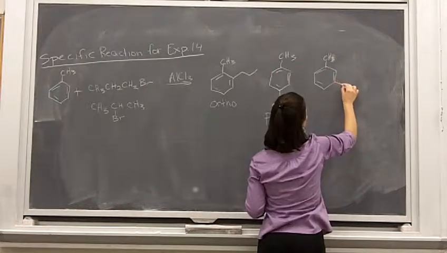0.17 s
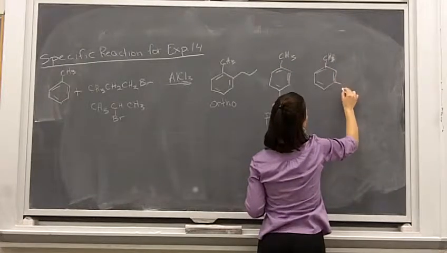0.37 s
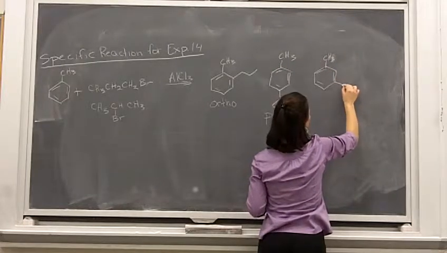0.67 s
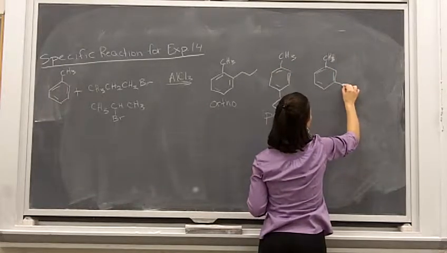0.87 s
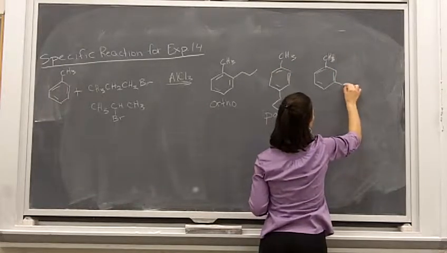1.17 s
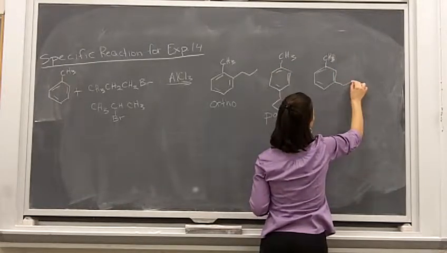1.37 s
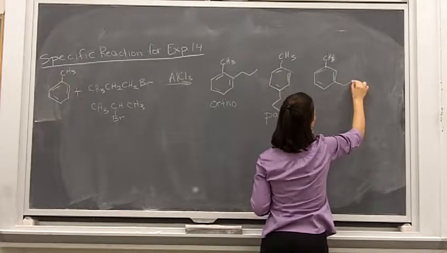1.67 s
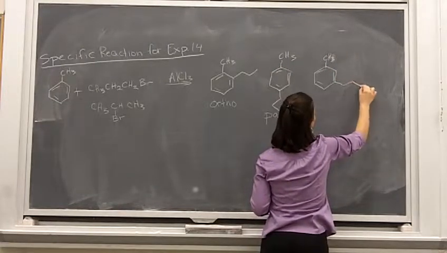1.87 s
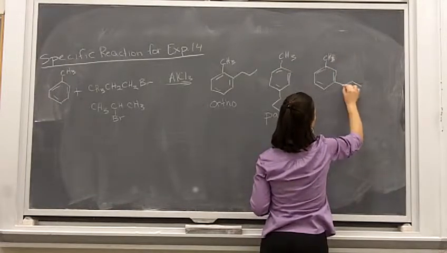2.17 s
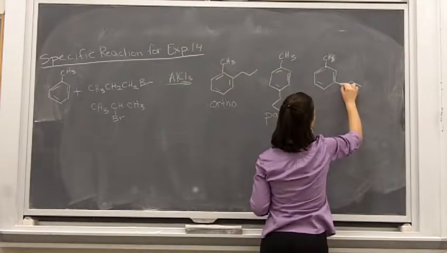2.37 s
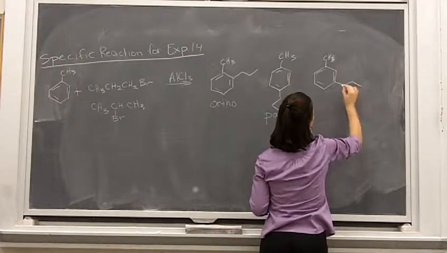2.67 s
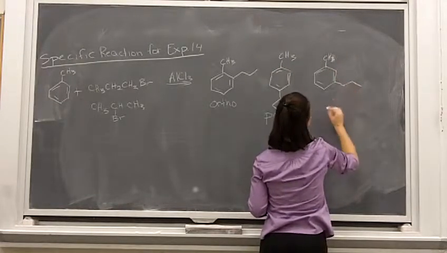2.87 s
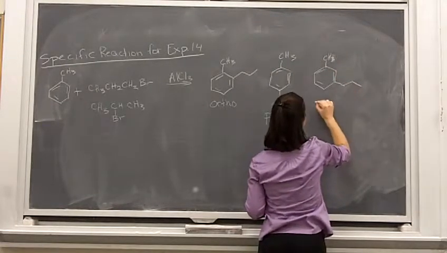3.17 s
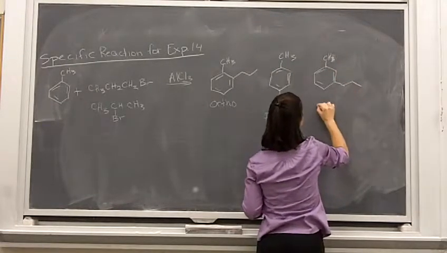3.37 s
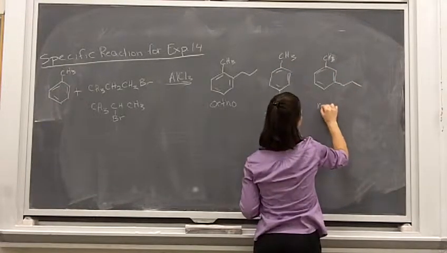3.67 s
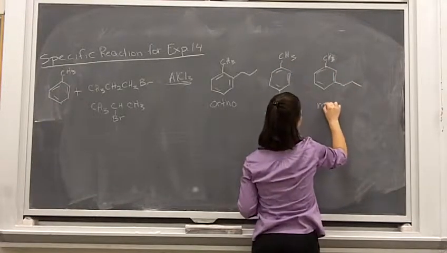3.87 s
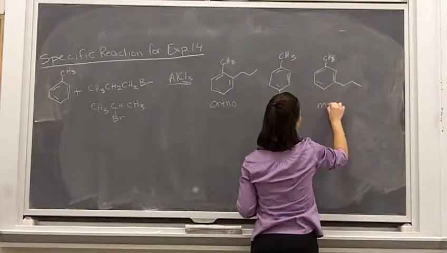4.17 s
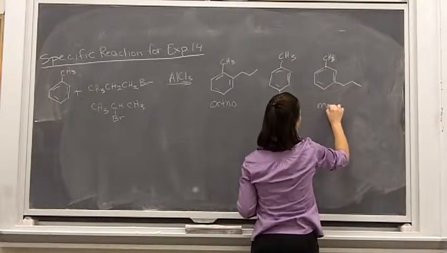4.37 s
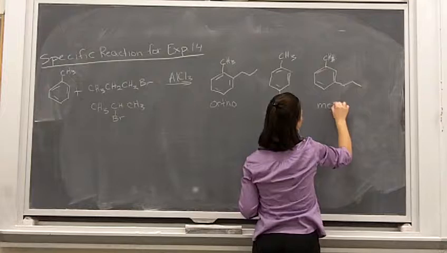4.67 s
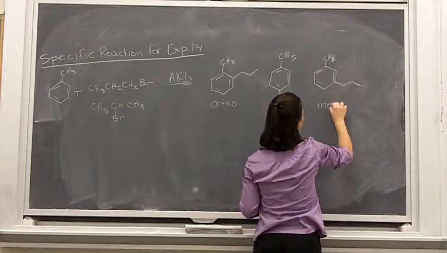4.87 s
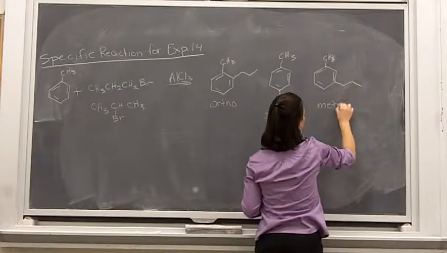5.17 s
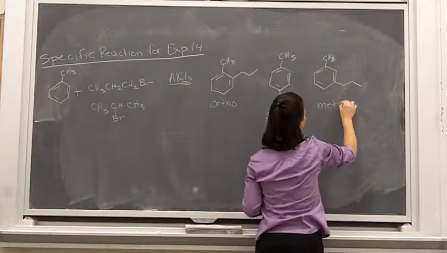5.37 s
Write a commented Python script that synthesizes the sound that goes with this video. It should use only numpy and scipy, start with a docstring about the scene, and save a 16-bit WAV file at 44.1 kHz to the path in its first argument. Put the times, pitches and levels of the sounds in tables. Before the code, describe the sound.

A classroom, heard from a camera a few metres from the blackboard. Low airy ventilation, slightly swelling rumble, faint mains hum, hiss, thin high whines and a rapid quiet ticking whirr last throughout. Chalk knocks the board immediately at 0 s, a hard tick with a woody, briefly ringing body and short room reflections. Lighter, brighter taps come near 0.95 and 1.1 s, a stronger one at 1.8 and another at 2.5. Firmer knocks fall at 3.45, 4.25, 4.75, 5.05 and 5.2 s. Between them are faint, dry, gritty rubs of about 0.1 to 0.3 s, clearest around 1.2, 3.6 and after 4.8 s. Close to the microphone, irregular dry crackly clicks tick all along, with small hollow pops from about 0.5 s; the strongest click and pop coincide at 3.3 s. Soft low bumps barely show near 1.6, 3.6 and 4.3 s. It ends amid chalk work.

```python
"""Ventilation, mains hum, thin whines, hiss and the ticking whirr of a camera's drive sound throughout.
Chalk, a few metres away, knocks at once on a blackboard: a tick, decaying modes and reflections.
Dry clicks close to the microphone follow as swarms of impulses; fainter ones fall at random throughout.
Then chalk rubs along the board as filtered grains, and small cavities pop as short decaying sines.
Later a few soft low bumps swell as sines of wandering pitch."""
import sys
import numpy as np
from scipy import signal
from scipy.fft import rfft, irfft
from scipy.io import wavfile
from scipy.ndimage import uniform_filter1d

SR = 44100
rng = np.random.default_rng(int(sys.argv[2]) if len(sys.argv) > 2 else 0)


def wrap_up_sound(samples):
    """Save the sound to the file named by the first command line argument, as 16-bit audio."""
    columns = np.atleast_2d(samples).T
    # keep every value between -1 and 1, then stretch to whole-number steps
    tamed = np.clip(columns, -1, 1)
    steps = np.round(tamed * 32767).astype(np.int16)
    wavfile.write(sys.argv[1], SR, steps)


N = 243167
TIME = np.arange(N) / SR  # s

# Levels in the tables are relative.
# Spectrum of the ventilation: [f/Hz, level/dB]
AIR_SPECTRUM = [(12, -39), (20, -3), (35, -13), (49, -17), (92, -20), (122, -24), (191, -29), (346, -35),
                (667, -45.5), (720, -34.5), (809, -38), (1240, -48.5), (2000, -50), (2600, -74),
                (4400, -120)]
# Spectrum of the duct rumble: [f/Hz, level/dB]
DUCT_SPECTRUM = [(10, -7.5), (22, -39), (30, -3.5), (40, -26), (70, -19.5), (300, -90)]
# Swelling of the duct rumble: [t/s, level/dB]
RUMBLE_LEVEL = [(0.0, -52.5), (1.56, -60), (2.36, -46), (3.28, -60), (4.35, -49.5), (4.96, -57), (5.5, -53)]
# Mains hum and thin high whines: [f/Hz, level/dB]
HUM_TONES = [(60, -52), (180, -65), (7866, -86.5), (10925, -106)]
# Spectrum of the hiss common to both channels: [f/Hz, level/dB]
HISS_SPECTRUM = [(1000, 8), (2100, 2.5), (3500, 0), (5000, -4), (7000, -1.5), (8500, -8), (12500, -8),
                 (13100, -17), (15000, -34)]
# Spectrum of the self-noise, unrelated left and right: [f/Hz, level/dB]
SELF_NOISE_SPECTRUM = [(20, 1), (150, -7.5), (400, -14), (720, -16), (950, -31.5), (3000, -38.5),
                       (5000, -52), (7000, -48), (8400, -35), (12400, -32.5), (13100, -49), (15000, -60)]
# Tones in each turn of the drive: [f/Hz, place in the turn/0-1, 1/e half-length/s, level/dB]
WHIRR_TONES = [(2676, .64, 0.0067, -69.5), (3140, 0.5, 0.00075, -63), (3350, 0.7, 0.0011, -60.5)]
# Chalk landings: [t/s, force level/dB, low-mode level/dB, treble level/dB, favoured f/Hz, favour level/dB]
CHALK_TAPS = [(.006, -1.5, -16.5, -24, 736, -0.5), (0.9439, -6.5, -13, 1.5, 815, 6),
              (1.121, -10, -17.5, 1, 790, 6.5), (1.7873, -.5, -16, 3.5, 740, 11),
              (2.506, -5, -16.5, 3.5, 780, 7), (3.4494, 3.5, -16.5, -3.5, 726, 2),
              (4.261, 4.5, -14.5, -3, 696, 6), (4.76, 5, -15, -5.5, 660, 9),
              (5.038, 3, -12.5, -3.5, 664, 4), (5.2238, -2, -11.5, -1.5, 800, 7)]
# Modes of the board: [f/Hz, level/dB, t60/s]
BOARD_MODES = [(137.9, 8.5, 0.41), (197, -22, 0.29), (273, -4, 0.58), (364, -9.5, 0.65),
               (420.4, -8.5, 0.45), (533, -17.5, 0.54), (592, -16, 0.54), (663, -6.5, 0.26),
               (759, -5, 0.31), (818, -3.5, 0.11), (910, -1, 0.046), (1200, -40, 0.54), (1225, -27, 0.71),
               (1466, -7, 0.085)]
# Spectrum of the first contact: [f/Hz, level/dB]
TICK_SPECTRUM = [(100, 11), (800, 5.5), (2000, 1.5), (4000, -4.5), (7000, -10.5), (11000, -26),
                 (15000, -74)]
# Spectrum of the panel's dense ring: [f/Hz, level/dB]
KNOCK_SPECTRUM = [(60, -19.5), (130, 0), (230, -5.5), (400, -3), (530, -3.5), (790, 4.5), (1000, -4.5),
                  (1200, -6.5), (1700, -9.5), (2600, -14), (4000, -23), (7000, -25), (10000, -42.5),
                  (15000, -45)]
# Clusters of early echoes off the walls: [delay t/s, level/dB, t60/s]
WALL_ECHOES = [(.007, -1, 0.079), (0.0219, -6, 0.11)]
# Decay of the room: [f/Hz, t60/s]
ROOM_DECAY = [(100, 1), (260, 0.61), (700, 0.54), (1840, 0.41), (4850, 0.25), (12000, 0.039)]
# Close clicks: [t/s, level/dB, spread of the snaps/s]
CLOSE_CLICKS = [(0.0538, -38, 0.0022), (.1625, -49.5, .0025), (.1976, -40, 0.0028), (0.3202, -37.5, 0.0069),
                (0.4548, -43, 0.0037), (0.5336, -47, 0.0014), (0.557, -46.5, 0.0029),
                (0.596, -51.5, 0.0048), (0.6862, -51, 0.0044), (.727, -54, 0.003), (0.7517, -50.5, 0.0047),
                (0.8212, -38.5, 0.0046), (0.9819, -48, .0034), (1.2244, -49, 0.003), (1.397, -45, 0.0033),
                (1.4067, -42.5, 0.0032), (1.5529, -45.5, 0.0045), (1.6683, -48.5, 0.011),
                (1.6932, -53, 0.0043), (1.8721, -45.5, 0.0034), (1.94, -48, 0.0027),
                (2.0243, -49.5, 0.0036), (2.0926, -49.5, 0.0017), (2.1371, -38, 0.0023),
                (2.166, -37.5, 0.0027), (2.257, -48.5, 0.0071), (2.301, -48.5, 0.0021),
                (2.3421, -53.5, 0.0051), (2.449, -53, 0.0027), (2.5012, -35, 0.0014), (2.588, -53.5, .004),
                (2.629, -44.5, 0.0025), (2.827, -47, 0.0039), (2.918, -45, 0.0024), (2.9683, -35, 0.0045),
                (3.0347, -55, .0043), (3.2882, -36, 0.0045), (3.2932, -27.5, 0.0025),
                (3.472, -44.5, 0.0052), (3.5901, -44, 0.0045), (3.6814, -43.5, 0.0052),
                (3.7875, -40.5, 0.0024), (3.8468, -41, 0.0025), (3.9667, -43.5, 0.0021),
                (4.0007, -47.5, 0.004), (4.0581, -48.5, 0.0051), (4.1016, -44, 0.0055),
                (4.153, -34.5, 0.0016), (4.205, -48, 0.0096), (4.3293, -44, 0.0035), (4.3718, -48, .0023),
                (4.4315, -40, .0044), (4.5988, -41.5, 0.0046), (4.6121, -38, 0.001), (4.693, -50.5, .004),
                (4.8198, -43.5, 0.0031), (4.9997, -50.5, 0.0035), (5.106, -43.5, 0.0024),
                (5.231, -36, 0.0041)]
# Spectrum of a click's bright snap: [f/Hz, level/dB]
SNAP_SPECTRUM = [(1500, -6.5), (4000, 3.5), (5500, 1), (7000, 5), (8200, 3), (10000, -3), (12500, -12),
                 (15000, -20)]
# Spectrum of a click's lower body: [f/Hz, level/dB]
SNAP_BODY_SPECTRUM = [(150, -2), (400, 8.5), (1000, 9), (1700, 3.5), (2800, -1), (4300, 7.5), (5500, -20),
                      (8000, -37.5)]
# Chalk drawn along the board: [t/s, length/s, level/dB]
CHALK_STROKES = [(0.435, 0.12, -61.5), (0.68, 0.098, -64), (1.166, 0.082, -58), (1.317, .062, -61.5),
                 (1.568, 0.23, -66), (1.847, 0.19, -65), (2.14, .16, -68), (2.55, 0.33, -66),
                 (3.543, 0.25, -59.5), (4.33, 0.34, -68), (4.815, 0.1, -62), (5.08, .13, -60),
                 (5.243, 0.18, -61.5)]
# Spectrum of the rubbing: [f/Hz, level/dB]
RUB_SPECTRUM = [(200, -6.5), (750, 1.5), (1300, -6.5), (2500, -5.5), (4300, -14.5), (7000, -13.5),
                (10000, -30), (15000, -30)]
# Close hollow pops: [t/s, level/dB, f/Hz]
HOLLOW_POPS = [(.462, -45.5, 720), (.531, -49, 776), (.754, -47, 870), (1.405, -40, 804), (1.513, -50, 990),
               (1.554, -39, 673), (1.668, -42.5, 747), (2.045, -49.5, 736), (2.091, -47, 810),
               (2.137, -47, 714), (2.264, -45, 725), (2.301, -48, 780), (2.37, -42, 774), (2.486, -45, 770),
               (2.724, -51.5, 526), (2.919, -43, 815), (3.293, -27, 614), (3.596, -36.5, 710),
               (3.68, -42, 717), (3.854, -40.5, 645), (3.998, -44.5, 780), (4.105, -42, 814),
               (4.214, -41.5, 690), (4.434, -52, 487), (4.608, -39.5, 682), (4.716, -46, 780),
               (5.002, -47.5, 920)]
# Modes of the popping cavity: [multiple of the pitch, level/dB, t60/s]
CAVITY_MODES = [(1.002, 0.5, 0.025), (1.62, -14, 0.027), (2.15, -9, 0.01), (2.8, -14, 0.018)]
# Soft low bumps: [t/s, length/s, mean f/Hz, level/dB]
LOW_BUMPS = [(1.571, 0.14, 240, -57), (1.618, 0.12, 180, -54), (3.632, 0.16, 107, -46.5),
             (4.313, 0.18, 30.8, -36.5)]
# Constant offset of each channel: one row per channel, [share of full scale]
CHANNEL_OFFSET = [
    [.0435],
    [.0087],
]

TURN_HZ = 29.96  # turns of the drive per second
EDGE_HZ = 15100  # upper limit of the band
CLICK_HZ, CLICK_SCATTER = 6860, .16  # centre of the treble peak, and its largest shift as a share
# A click at SOFT_CLICK_DB has SOFT_BODY_DB of body, which falls by SHARPEN dB per dB of level.
SOFT_CLICK_DB, SOFT_BODY_DB, SHARPEN = -48.5, 16, 0.52


def amp(db):
    """Level law: an amplitude ratio is ten to the power dB/20."""
    return 10 ** (np.asarray(db) / 20)


def evened(x):
    """Normalisation of power: scales to rms 1."""
    return x / np.sqrt(np.mean(x ** 2) + 1e-20)


def read(points, hz):
    """Interpolation on a logarithmic frequency axis."""
    f, value = np.transpose(points)
    return np.interp(np.log(hz + 1), np.log(f + 1), value)


def add(mix, s, sound):
    """Superposition: adds a sound into the mix from time s."""
    part = mix[max(round(s * SR), 0):][:len(sound)]
    part += sound[:len(part)]


def pulse(points, size=2048):
    """Minimum phase: the log gain fixes the phase of the sharpest causal pulse; energy 1."""
    log_gain = np.log(amp(read(points, abs(np.fft.fftfreq(size, 1 / SR)))))
    spectrum = np.exp(np.conj(signal.hilbert(log_gain)))
    h = np.fft.ifft(spectrum).real[:size // 2]
    return h / np.linalg.norm(h)


def band(x, lo_hz, hi_hz):
    """Band-pass filtering with gentle slopes."""
    sections = signal.butter(2, [lo_hz, min(hi_hz, .49 * SR)], "band", fs=SR, output="sos")
    return signal.sosfilt(sections, x)


def noise(points):
    """Spectral shaping of steady white noise; rms 1."""
    gain = amp(read(points, np.fft.rfftfreq(N, 1 / SR)))
    return evened(irfft(rfft(rng.standard_normal(N)) * gain, N))


def tail(t60s, size=32768):
    """Reverberation: dense reflections of random sign decay at their own rate in each band; energy 1."""
    hz, t, z = signal.stft(rng.choice([-1., 1.], size), SR, nperseg=256)
    decay = amp(-60 * t / read(t60s, hz)[:, None])
    h = signal.istft(z * decay, SR, nperseg=256)[1][:size]
    return h / np.linalg.norm(h)


def flatten(x, size):
    """Spectral whitening: evens out chance peaks and dips over size bins; energy 1."""
    z = rfft(x)
    local_power = uniform_filter1d(abs(z) ** 2, size)
    flat = irfft(z / np.sqrt(abs(local_power) + 1e-9), len(x))
    return flat / np.linalg.norm(flat)


def flat_tail(t60s):
    """Reverberation with a whitened spectrum, so that the tail adds little colour."""
    return flatten(tail(t60s), size=60)


def background(air_db=-63.5, hiss_db=-67, self_db=-64):
    """Superposition of independent sources: shaped noises, a swelling duct rumble and steady sines."""
    air = noise(AIR_SPECTRUM)
    air = air - band(air, 50.7, 71.3)  # leaves this band to the hum
    air *= amp(air_db) / np.std(band(air, 197, 2200))  # air_db is the level within this band
    duct = noise(DUCT_SPECTRUM) * amp(np.interp(TIME, *np.transpose(RUMBLE_LEVEL)))
    hum = np.zeros(N)
    for hz, db in HUM_TONES:
        hum += amp(db) * np.sqrt(2) * np.sin(2 * np.pi * (hz * TIME + rng.random()))
    own = amp(self_db) * np.array([noise(SELF_NOISE_SPECTRUM), noise(SELF_NOISE_SPECTRUM)])
    return air + duct + hum + amp(hiss_db) * noise(HISS_SPECTRUM) + own


def whirr(unsteady_rad=0.55, uneven_db=1.9):
    """Periodic modulation: each turn of the drive gates three brief tones of unsteady phase and level."""
    out = np.zeros(N)
    for hz, place, length, db in WHIRR_TONES:
        t = ((TIME * TURN_HZ - place + .5) % 1 - .5) / TURN_HZ  # time from the tone's centre
        waver = evened(uniform_filter1d(rng.standard_normal(N), 400))
        swell = evened(uniform_filter1d(rng.standard_normal(N), 1200))
        envelope = amp(db + uneven_db * swell) * np.exp(-(t / length) ** 2)
        out += envelope * np.sin(2 * np.pi * hz * t + unsteady_rad * waver)
    return out


def taps(level_db=-13, direct_db=-7, rattle_t60=0.31, room_db=-5, modes_db=-38, favour_width=0.077,
         alike=0.67):
    """Impact excitation: contact gives a tick, then the panel's dense ring, its modes and the room."""
    out, knock, tick = np.zeros(N), pulse(KNOCK_SPECTRUM), pulse(TICK_SPECTRUM)
    rattle = [(100, rattle_t60), (10000, rattle_t60 * 0.23)]  # f/Hz, t60/s
    panel = flat_tail(rattle)
    t = np.arange(len(panel)) / SR
    for s, force_db, boom_db, bright_db, spot_hz, favour_db in CHALK_TAPS:
        # nearby spots ring much alike
        paths = alike * panel + np.sqrt(1 - alike ** 2) * flat_tail(rattle)
        for delay, db, t60 in WALL_ECHOES:
            add(paths, delay, amp(db) * tail([(100, t60), (10000, t60)]))
        add(paths, .008, amp(room_db) * tail(ROOM_DECAY))
        paths = paths * np.minimum(2 - 2 * t / t[-1], 1) ** 2  # the second half fades to nothing
        sound = amp(level_db) * signal.fftconvolve(paths, knock)[:len(t)]
        add(sound, 0, amp(level_db + direct_db) * tick)
        for hz, db, t60 in BOARD_MODES:
            # the place of the blow sets how much each mode takes
            favour = np.exp(-(np.log(hz / spot_hz) / favour_width) ** 2)
            share_db = boom_db / (1 + (hz / 450) ** 2) + favour_db * favour
            decay = amp(modes_db + db + share_db - 60 * t / t60)
            onset = 1 - np.exp(-t / 0.00026)
            sound += decay * onset * np.sin(2 * np.pi * (hz * t + rng.random()))
        treble = sound - signal.lfilter(*signal.butter(1, 1800, fs=SR), sound)
        add(out, s, amp(force_db) * (sound + (amp(bright_db) - 1) * treble))
    return out


def faint_clicks(snap_db=-53, body_db=-52, per_s=30, spread_db=3.5, swarm_s=.0025, size=1024):
    """Random point process: faint ticks of uneven level fall independently in time."""
    levels = amp(spread_db * np.minimum(rng.exponential(1, N), 3))
    ticks = levels * (rng.random(N) < per_s / SR)
    burst = rng.standard_normal(size) * np.exp(-np.arange(size) / (swarm_s * SR))
    swarm = flatten(np.roll(burst, size // 16), size=20)
    colour = amp(snap_db) * pulse(SNAP_SPECTRUM) + amp(body_db) * pulse(SNAP_BODY_SPECTRUM)
    return signal.fftconvolve(ticks, np.convolve(swarm, colour))[:N]


def clicks(snap_db=8, peak_db=3, peak_width_hz=1600, snaps_per_s=3000, first=0.77, hard_db=-38,
           size=2048):
    """Impulse excitation of a resonance: a snap and its swarm ring a treble peak; soft ones are duller."""
    out, t = np.zeros(N), np.arange(size) / SR
    snap, body = amp(snap_db) * pulse(SNAP_SPECTRUM), pulse(SNAP_BODY_SPECTRUM)
    lead = size // 16  # samples of room ahead of the first snap for the whitening
    for s, db, spread in CLOSE_CLICKS:
        hz = CLICK_HZ * (1 + CLICK_SCATTER * (2 * rng.random() - 1))
        # above hard_db the body's share falls no further
        body_db = SOFT_BODY_DB - SHARPEN * (min(db, hard_db) - SOFT_CLICK_DB)
        u = t / spread
        hits = rng.standard_normal(size) * (rng.random(size) < snaps_per_s / SR)
        swarm = hits * (1 + u) * np.exp(-.8 * u ** 2)
        swarm[0] = first
        swarm = flatten(np.roll(swarm, lead), size=24)
        swarm *= np.sqrt(spread / 0.0019)  # longer swarms carry more energy
        peak = amp(peak_db) * signal.lfilter(*signal.iirpeak(hz, hz / peak_width_hz, SR), snap)
        colour = snap + peak + amp(body_db) * body
        add(out, s - lead / SR, amp(db) * signal.fftconvolve(swarm, colour))
    return out


def strokes(grain_db=9.0, grains_per_s=2500, dry_db=-3.5, room_db=-7):
    """Friction as random impulses: crumbling chalk grains excite the board, blurred by the room."""
    pressure = np.zeros(N)
    for s, length, db in CHALK_STROKES:
        add(pressure, s, amp(db) * signal.windows.tukey(max(round(length * SR), 2), .6))
    sizes = amp(grain_db * np.minimum(rng.exponential(1, N), 5))
    grains = sizes * rng.choice([-1, 1], N) * (rng.random(N) < grains_per_s / SR)
    rub = pressure * evened(signal.fftconvolve(grains, pulse(RUB_SPECTRUM))[:N])
    return amp(dry_db) * rub + amp(room_db) * signal.fftconvolve(rub, tail(ROOM_DECAY))[:N]


def pops(level_db=5, rise_s=0.00071, soft_db=-45, harden=0.2, size=4096):
    """Cavity resonance: damped modes ring for a few cycles; harder pops bring out the upper ones."""
    out, t = np.zeros(N), np.arange(size) / SR
    for s, db, hz in HOLLOW_POPS:
        for multiple, mode_db, t60 in CAVITY_MODES:
            upper_db = harden * (db - soft_db) * (multiple > np.sqrt(2))
            decay = amp(db + level_db + mode_db + upper_db - 60 * t / t60)
            ring = decay * (1 - np.exp(-t / rise_s))
            add(out, s, ring * np.sin(2 * np.pi * multiple * hz * t))
    return out


def bumps(wander=0.2):
    """Frequency modulation: smoothed noise makes the pitch of soft low swells wander."""
    out = np.zeros(N)
    for s, length, hz, db in LOW_BUMPS:
        drift = evened(uniform_filter1d(rng.standard_normal(SR), size=160))[:round(length * SR)]
        phase = 2 * np.pi * np.cumsum(hz * (1 + wander * drift)) / SR
        add(out, s, amp(db) * np.hanning(len(drift)) * np.sin(phase))
    return out


def scene(click_room_db=-15, pop_room_db=-22, near_db=-11, near_t60=0.074, width_db=-33):
    """Direct and reflected sound: the board lies ahead; close sounds gain brief echoes and little room."""
    ambience = background() + whirr()
    knocks = taps()
    snaps = faint_clicks() + clicks()
    board = knocks + strokes()
    hollow = pops()
    close = snaps + hollow
    near = flat_tail([(100, near_t60), (10000, near_t60)])[:SR // 8]
    close = close + amp(near_db) * signal.fftconvolve(close, near)[:N]
    room_feed = amp(click_room_db) * snaps + amp(pop_room_db) * hollow
    close_room = signal.fftconvolve(room_feed, tail(ROOM_DECAY))[:N]
    # a short tail of opposite sign left and right gives slight width
    spread = tail([(100, 0.0061), (10000, 0.022)])
    side = amp(width_db) * signal.fftconvolve(board + close, spread)[:N]
    return board + close + close_room + np.array([side, -side]) + bumps() + ambience


def record(dry, notch_hz=5440, notch_width_hz=640, notch_floor_db=-20, faint_hiss_db=-80):
    """Linear filtering: a treble notch and a band limit; faint steady hiss lies beneath; channels offset."""
    notched = signal.lfilter(*signal.iirnotch(notch_hz, notch_hz / notch_width_hz, SR), dry)
    coloured = notched + amp(notch_floor_db) * (dry - notched)  # a little passes at the notch's bottom
    # the faint hiss is heard within the notch too
    coloured = coloured + amp(faint_hiss_db) * noise(HISS_SPECTRUM)
    low_pass = signal.firwin(401, EDGE_HZ, window=("kaiser", 8), fs=SR)
    return signal.oaconvolve(coloured, low_pass[None], "same") + CHANNEL_OFFSET


dry = scene()
out = record(dry)
wrap_up_sound(out)
```